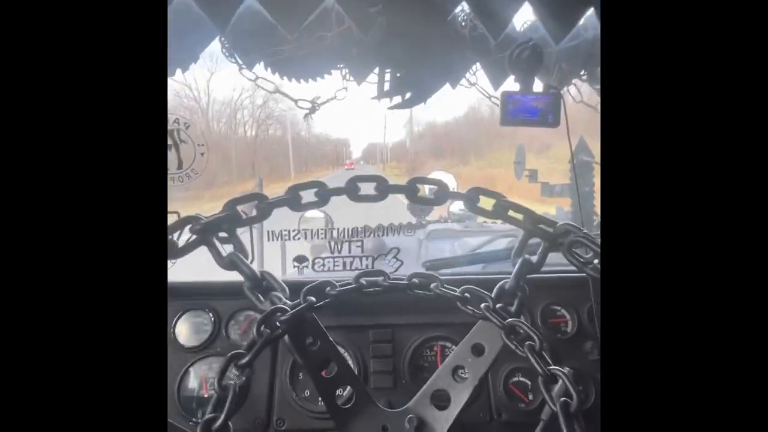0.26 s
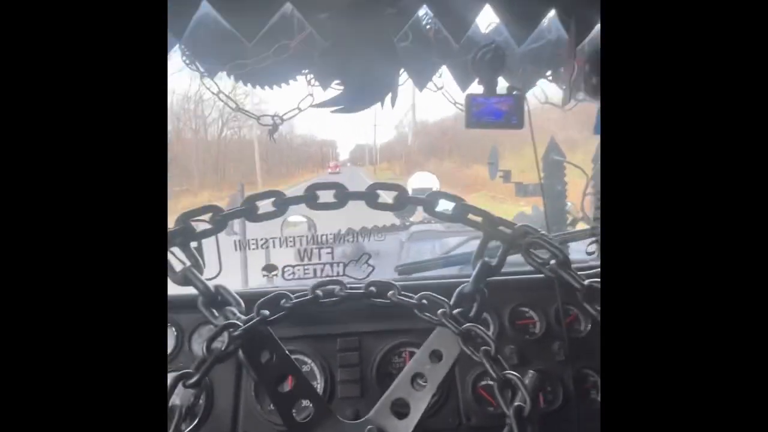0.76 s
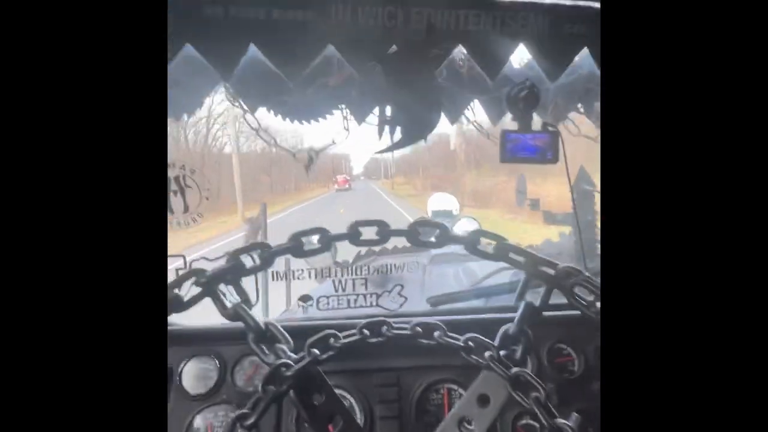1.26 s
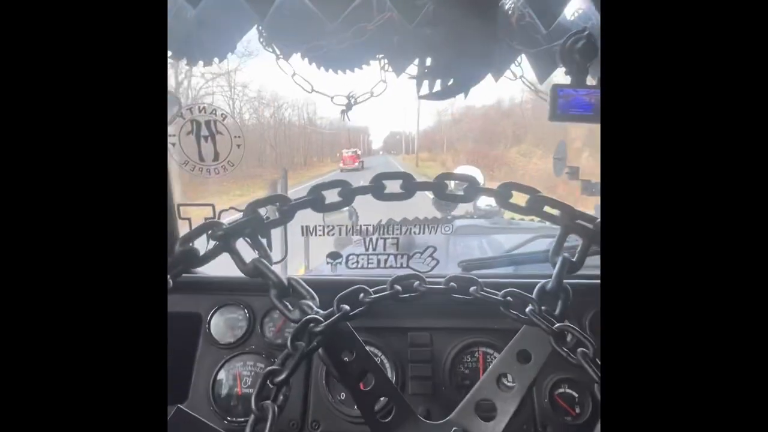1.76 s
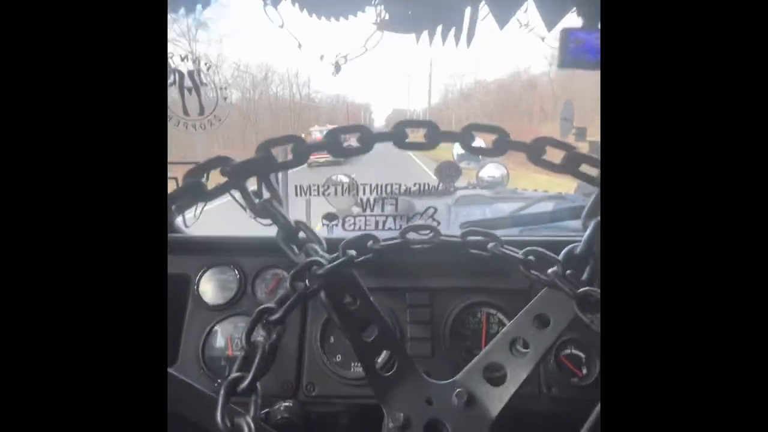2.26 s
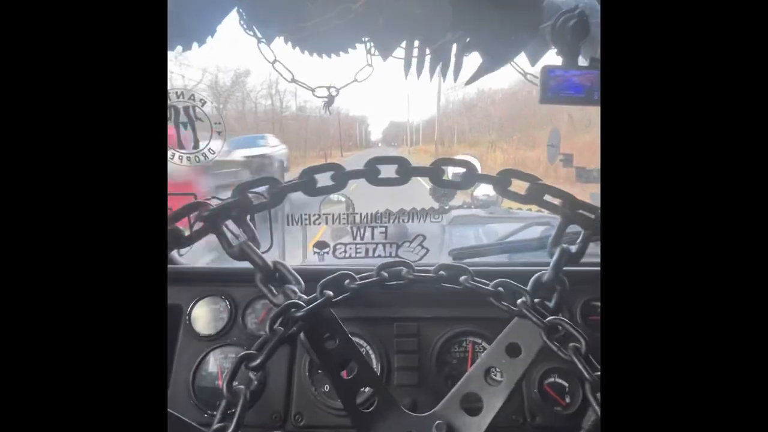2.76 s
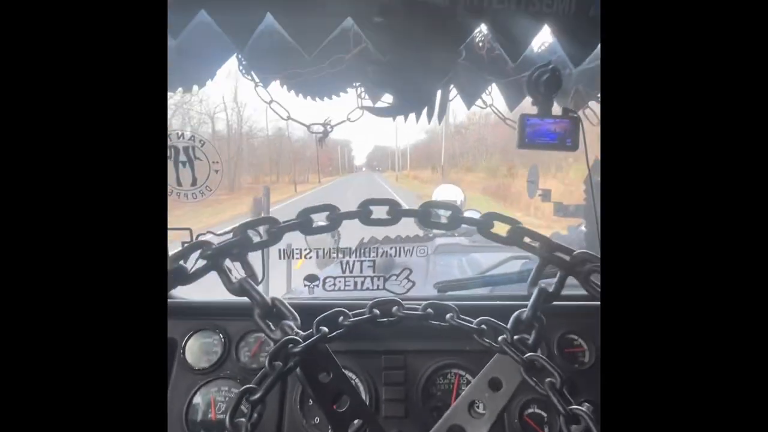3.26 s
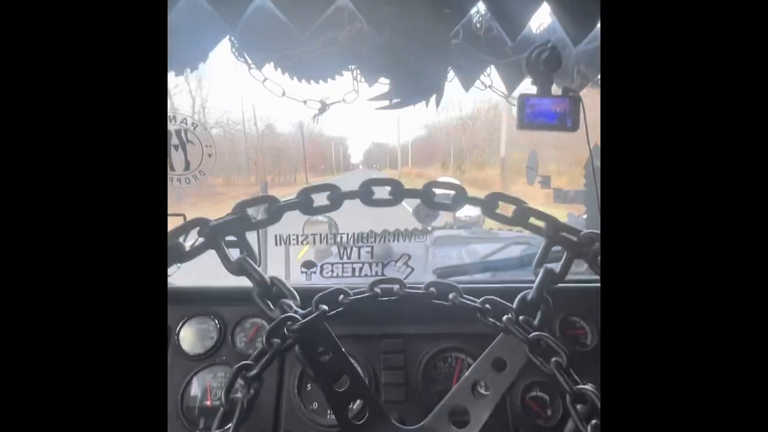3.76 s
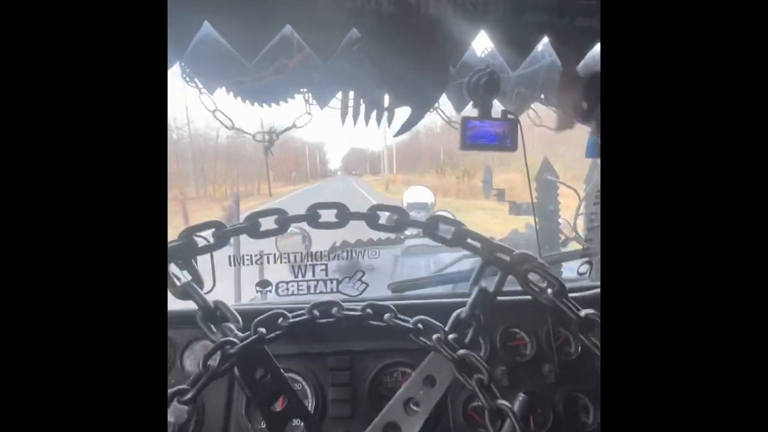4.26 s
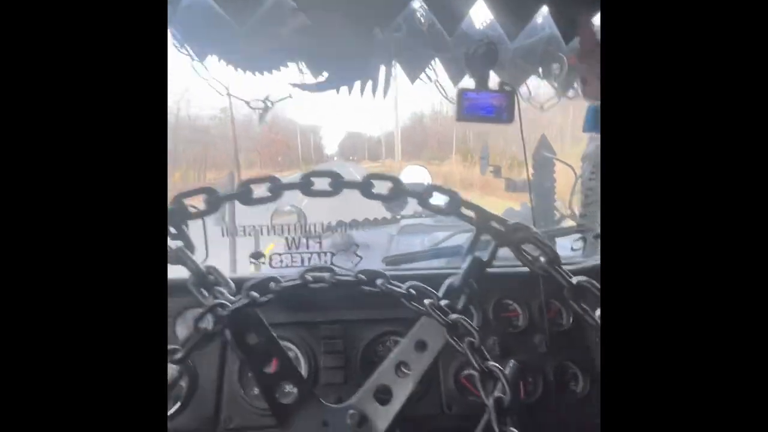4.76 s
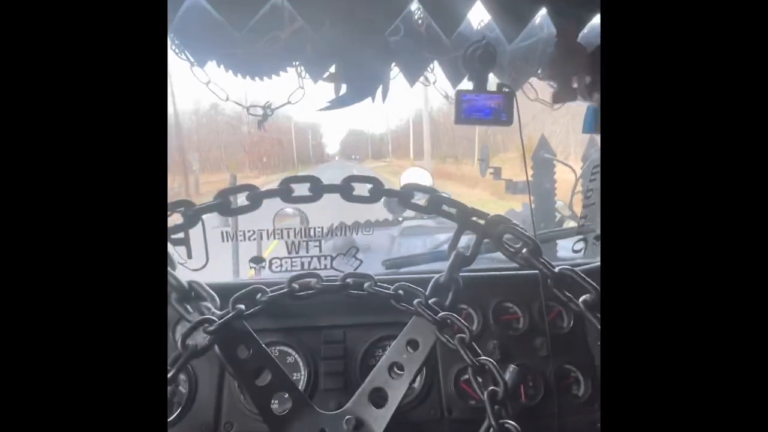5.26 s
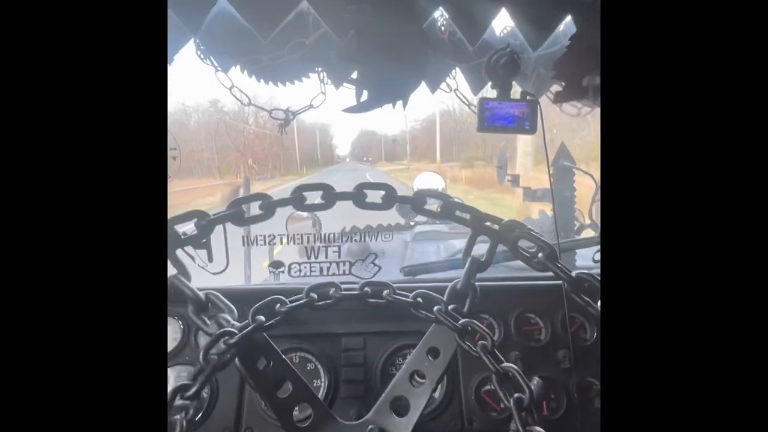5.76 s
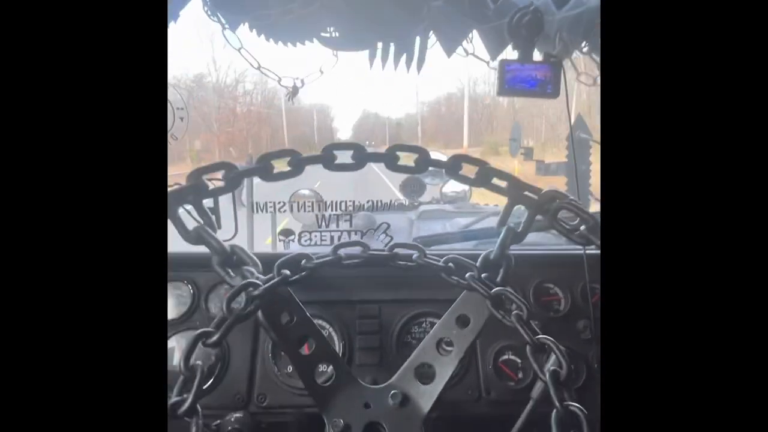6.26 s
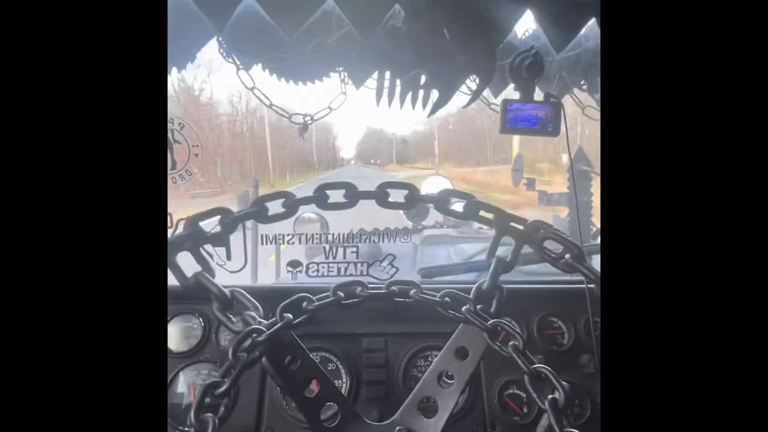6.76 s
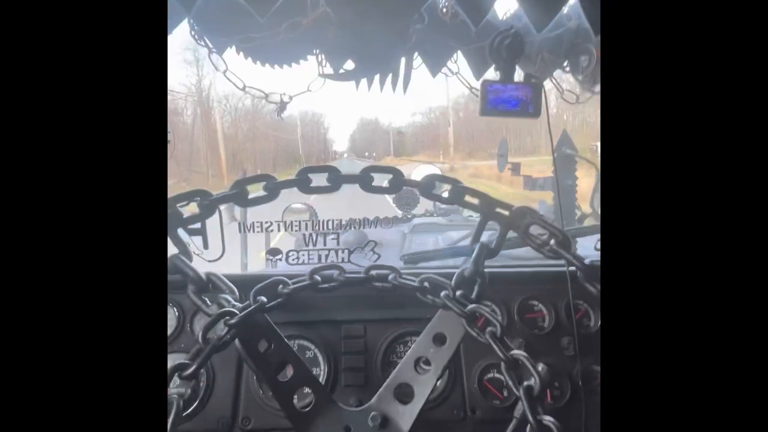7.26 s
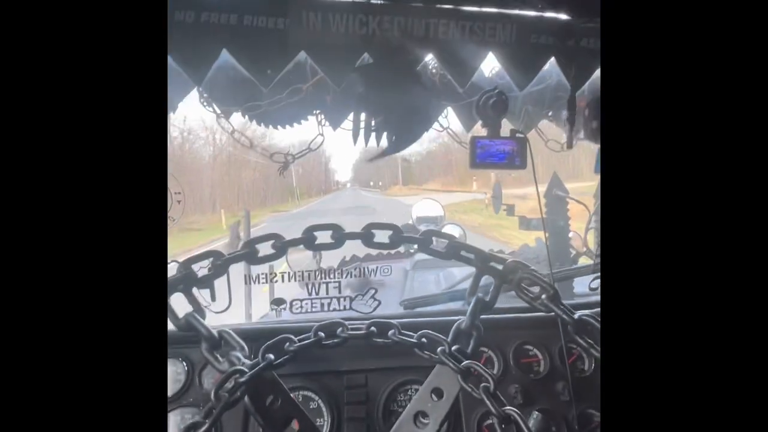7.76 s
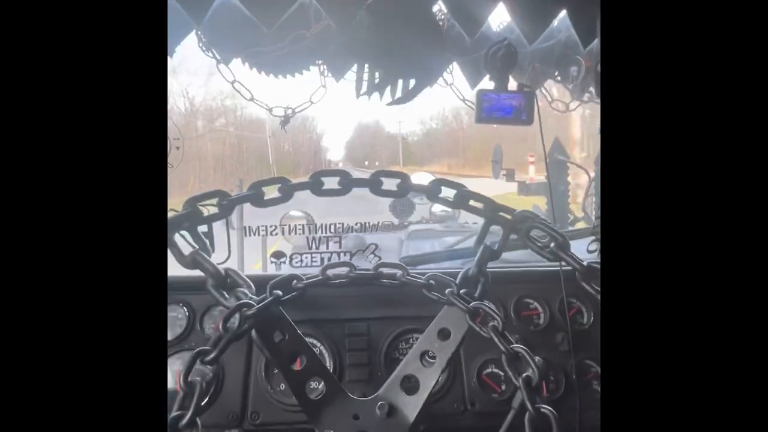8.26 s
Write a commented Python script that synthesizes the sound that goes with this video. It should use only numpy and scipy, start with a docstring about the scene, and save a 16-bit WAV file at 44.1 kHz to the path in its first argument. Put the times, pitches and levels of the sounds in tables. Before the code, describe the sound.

Close in-cab sound of a hard-pulling diesel on a road. Its throbbing drone and growl sag at two gear changes, and a blurred high whistle sinks and spools up after each. The first change brings a sharp air spit. Hollow intake hoots swell softly, while the dashboard buzzes, loose parts rattle, a small link squeaks and hanging chains jingle now and then.

```python
"""An exhaust drone fills the cab of a six-cylinder diesel truck throughout; it pulls hard and shifts up twice.
Engine tones follow the firing rate, over coloured noise for road and air. The intake hoots as a bending
tone, and the turbo whistle, a blurred tone, sinks at each shift and spools up again.
Small parts buzz, squeak and rattle as short rings and noise bursts. An air valve spits at the first
shift in shaped noise, and chains on the steering wheel clink as many fading tones."""
import sys
import numpy as np
from scipy import signal
from scipy.fft import rfft, irfft, next_fast_len
from scipy.io import wavfile
from scipy.ndimage import uniform_filter1d, minimum_filter1d

SR = 44100
rng = np.random.default_rng(int(sys.argv[2]) if len(sys.argv) > 2 else 0)


def waveform_to_disk(signal):
    """Save audio, clipped to [-1, 1], as 16-bit WAV at the path in sys.argv[1]."""
    frames = np.transpose(np.atleast_2d(signal))
    scaled = np.clip(frames, -1, 1) * 32767
    samples = np.round(scaled).astype(np.int16)
    wavfile.write(sys.argv[1], SR, samples)


N = 375732
TIME = np.arange(N) / SR


def gain_of(db):
    """Turns decibels into amplitude."""
    return 10 ** (np.asarray(db) / 20)


def evened(x):
    """Scales a sound to an average (rms) strength of 1."""
    return x / np.sqrt(np.mean(x ** 2) + 1e-20)


def read(points, hz):
    """Reads a table of frequencies at any frequency, on a logarithmic scale."""
    f, value = np.transpose(points)
    return np.interp(np.log(hz + 1), np.log(f + 1), value)


def curve(points):
    """Draws a (time, value) table as one value per sample."""
    s, value = np.transpose(points)
    return np.interp(TIME, s, value)


def add(mix, s, sound):
    """Mixes a stereo sound in at time s, in seconds."""
    part = mix[:, max(round(s * SR), 0):][:, :sound.shape[1]]
    part += sound[:, :part.shape[1]]


def drift(per_s, times=TIME):
    """Smooth random wandering of rms 1 that changes about per_s times a second."""
    knots = np.linspace(0, TIME[-1], N // 64)
    f = np.fft.rfftfreq(len(knots), knots[1])
    spectrum = rfft(rng.standard_normal(len(knots))) / (1 + (f / per_s) ** 4)
    return np.interp(times, knots, evened(irfft(spectrum, len(knots))))


# How alike noise is in the left and right channels: (frequency [Hz], likeness [-1 to 1])
LEFT_RIGHT_LIKENESS = [(140, 1), (300, .96), (500, .73), (900, .47), (1600, .52), (2500, .3), (3400, .22),
                       (4200, .4), (5000, -.1), (6200, 0), (7200, -.35), (8200, -.7), (9800, -.96),
                       (11000, -.998)]


def noise(spectrum, size=N, treble_db=0):
    """Coloured stereo noise: bass is alike in both channels, the highest treble is opposed."""
    full = next_fast_len(size)
    hz = np.fft.rfftfreq(full, 1 / SR)
    same = np.clip(read(LEFT_RIGHT_LIKENESS, hz), -1, 1)
    mid, side = rfft(rng.standard_normal((2, full))) * np.sqrt([1 + same, 1 - same])
    treble_tilt = treble_db * np.clip((hz - 4000) / 6000, 0, 1)
    colour = gain_of(read(spectrum, hz) + treble_tilt)
    return evened(irfft(np.array([mid + side, mid - side]) * colour, full)[:, :size])


def panned(x, right_db):
    """Leans a sound right by this many dB between the channels; below zero leans left."""
    return x * gain_of(np.array([[-.5], [.5]]) * right_db)


def cab_echo(x, count=14, spread=0.01, strength=.17):
    """Early reflections from glass and dashboard, up to spread seconds late, comb the sound finely."""
    taps = np.zeros((2, SR // 20))
    taps[:, 0] = 1
    for side in taps:
        delays = (rng.uniform(.1, 1, count) * spread * SR).astype(int)
        side[delays] += strength * rng.choice([-1, 1], count)
    return evened(signal.oaconvolve(x, taps, axes=1)[:, :N])


BOOM_COAST_DB = -22  # boom of the uneven cylinders without boost
# One pull in each gear: (pedal down [s], time to press [s], pedal lifted [s], time to lift [s],
# change of the drone's overtones [dB], boom of the uneven cylinders at full boost [dB])
PULLS = [(-0.5, .1, 0.5, .14, -2.5, -10.5), (1.268, 0.17, 4.66, .35, 2, -17),
         (5.58, 0.069, 9, .3, -2.5, -17)]


def pedal(bite_db=11, bite_s=0.16):
    """Throttle 0-1, and the dB each pull adds to overtones and boom; overtones bark as the gear loads."""
    throttle, bark_db, boom_db = np.zeros((3, N))
    for down, press, up, lift, overtones_db, pull_boom_db in PULLS:
        pressing = np.clip((TIME - down) / press, 0, 1)
        held = pressing * np.clip(1 - (TIME - up) / lift, 0, 1)
        bite = bite_db * np.exp(-np.maximum(TIME - down, 0) / bite_s)
        throttle += held
        bark_db += held * (overtones_db + bite)
        boom_db += held * (pull_boom_db - BOOM_COAST_DB)
    return throttle, bark_db, boom_db


# The drone under throttle, sweeping through the cab's resonances: (frequency [Hz], level [dB])
DRONE = [(64, -12.7), (66.3, -11.5), (69, -13), (71.5, -10.8), (74.5, -14), (77, -14), (128, -19.5),
         (130, -18.5), (132.4, -25), (135, -13.5), (138, -10), (142, -14), (147, -8), (151, -10.5),
         (155, -17), (195, -42), (212, -38), (222, -21), (227, -26), (233, -39)]
# The drone with the pedal up, one entry for each of three firing harmonics: level [dB]
COAST_LEVELS = [-18, -21.5, -42]


def drone_levels(firing_hz, throttle, bark_db):
    """Under throttle each firing harmonic swells to the cab's response at its pitch."""
    levels = []
    for k, coast in enumerate(COAST_LEVELS):
        pulling = read(DRONE, (k + 1) * firing_hz)
        bark = bark_db * (k > 0)  # only the overtones bark
        levels.append(coast + throttle * (pulling - coast) + bark)
    return levels


def exhaust(cycle, harmonics_db, throttle, flutter=0.089, falter=.4):
    """Six even firings a cycle give the drone and its overtones; with the pedal up they falter."""
    unsteady = flutter + falter * (1 - throttle)
    drone = 0
    for k, db in zip((6, 12, 18), harmonics_db):
        level = gain_of(db) * (1 + unsteady * drift(20))
        drone = drone + level * np.cos(2 * np.pi * k * cycle + unsteady * drift(21))
    return panned(np.sqrt(2) * drone, right_db=-.45)


# Cylinder imbalance: (multiple of the two-turn engine cycle, relative level [dB])
UNEVEN = [(2, 3), (3, -5), (4, 2.5), (5, -5.5), (7, -6), (8, -1), (9, 1.5), (10, -1.5), (11, 1), (13, -3),
          (14, 3), (15, 5.5), (16, -4.5), (17, 0)]
# How the cab answers low tones: (frequency [Hz], relative level [dB])
CAB = [(20, -27.5), (35, -10.5), (50, -8.5), (85, 0), (103, -4), (118, -1.5), (135, -2), (150, -3),
       (160, 0), (165, 3), (171, 0.5), (178, -11.5), (195, -14), (225, -11.5), (300, -26)]


def lope(cycle, cycle_hz, boom_db, waver=0.22):
    """Unequal cylinders add tones between the firing harmonics, which swell at the cab's resonances."""
    lines = 0
    for k, db in UNEVEN:
        level = gain_of(db + read(CAB, round(k) * cycle_hz)) * (1 + waver * drift(2.4))
        lines = lines + level * np.cos(2 * np.pi * (round(k) * cycle + rng.random()))
    return panned(evened(lines) * gain_of(boom_db), right_db=-.5)


# Panel resonances: (frequency [Hz], relative level [dB])
PANELS = [(190, -10), (225, 5), (258, 6), (292, -3), (302, 0), (312, 9), (324, 9.5), (345, 6), (372, 4),
          (400, 4), (425, -4), (460, 2), (490, 4), (525, -3), (570, 1), (615, -4), (655, -3), (690, -9),
          (745, -8), (800, -14), (1000, -21)]
# Engine orders that shake the cab differently: (multiple of the cycle, extra level [dB])
STRONG_ORDERS = [(20, 8), (21, 3), (23, 5), (24, 6), (25, -1), (26, 10), (27, 2), (28, 3), (29, 6), (30, 6),
                 (32, 4), (33, 3), (35, 6), (36, 4), (42, 6), (47, 4), (48, 3), (51, 4), (53, 4), (57, -2)]


def growl(cycle, cycle_hz, roar_db, throttle, tilt_db=0.3561, width=0.46, coast_db=-5):
    """The higher engine orders shake the panels; each swells as it crosses a resonance."""
    out, hop = np.zeros((2, N)), 256  # levels are worked out every hop samples
    # uneven firing times roughen the high orders
    turn = np.exp(2j * np.pi * (cycle + .0008 * drift(22)))
    line = turn ** 18
    extra_db = {round(k): db for k, db in STRONG_ORDERS}
    for k in range(19, 80):
        line = line * turn
        hz = k * cycle_hz[::hop]
        swell_db = 3 * np.minimum(drift(1.8, TIME[::hop]), 1.5)
        level_db = read(PANELS, hz) + tilt_db * k + extra_db.get(k, 0) + swell_db
        level = np.interp(TIME, TIME[::hop], gain_of(level_db))
        # left and right phases differ more at higher pitch
        stereo_phase = width * hz[0] / 400 * rng.standard_normal((2, 1))
        phase = 2 * np.pi * rng.random() + stereo_phase
        out += level * (line * np.exp(1j * phase)).real
    return panned(evened(out) * gain_of(roar_db + 1 + coast_db * (1 - throttle)), right_db=-2.0)


# Colours of the low rumble, the roar and the hiss: (frequency [Hz], relative level [dB per Hz])
RUMBLE = [(8, -23.5), (20, -9.5), (32, -6.5), (50, 0.5), (85, -2.5), (120, 4.5), (165, -6), (200, -11),
          (300, -13.5), (600, -51.5)]
ROAR = [(120, -26.5), (200, 4.5), (250, 3), (290, -3.5), (325, -14), (380, 3), (425, -4), (485, -2.5),
        (700, -7.5), (1000, -15.5), (1400, -19), (2200, -28.5), (5000, -56)]
HISS = [(600, -11), (1250, 3.5), (1470, 4.5), (1560, 5), (1650, 2), (2300, 0), (3200, 1.3), (4200, -2.5),
        (4900, -5.5), (5700, -5.5), (6500, -5), (7500, -11), (8500, -10.5), (9500, -23), (12000, -54.5),
        (14500, -35.5), (15700, -31.5)]
# Tread of the tyres on the asphalt: (frequency [Hz], relative level [dB per Hz])
TYRES = [(500, -26), (780, -3), (910, 1), (1100, -1.5), (1300, -12), (1900, -46.5)]


def road_and_air(cycle, boom_db, roar_db, hiss_db, rumble_db=-25, tyres_db=-35.5):
    """Rumble and tyre noise under a roar and hiss that pulse one, three and six times an engine cycle."""
    beat = np.cos(6 * np.pi * cycle) + 0.93 * np.cos(12 * np.pi * cycle) + 0.55 * np.cos(2 * np.pi * cycle)
    # the rumble rises a little with the boom
    rumble = noise(RUMBLE) * gain_of(rumble_db + 0.077 * (boom_db - boom_db.mean()))
    roar = noise(ROAR) * gain_of(roar_db) * (1 + 0.2 * beat + 0.098 * drift(48))
    hiss = noise(HISS) * gain_of(hiss_db) * (1 + 0.017 * beat + 0.14 * drift(16))
    tyres = noise(TYRES) * gain_of(tyres_db)
    return rumble + panned(roar + tyres, right_db=-2.0) + panned(hiss, right_db=-1.0)


# Swells of the intake hoot: (peak time [s], length [s], level [dB])
HOOTS = [(0.727, 0.27, -24.5), (1.091, 0.15, -20.5), (2.17, 0.56, -26), (2.897, 0.37, -27),
         (4.88, 0.24, -22.5), (6.23, 0.17, -25.5), (6.69, 0.66, -23), (7.4, 0.74, -31.5),
         (8.48, 0.4, -22.5)]
# How the hoot bends, pedal up: (turbo blade tone [Hz], hoot pitch [Hz])
HOOT_PITCH = [(5000, 346), (5900, 355), (6500, 366), (7400, 377), (7950, 380), (8130, 373)]


def intake(blade_hz, throttle, rest_db=-42.5, load_hz=5, waver_hz=2, flutter=0.24):
    """A hollow hoot that bends with the turbo's airflow and comes in swells."""
    level = gain_of(rest_db)
    for s, length, db in HOOTS:
        level = level + gain_of(db) * np.exp(-(2 * (TIME - s) / length) ** 2)
    hz = read(HOOT_PITCH, blade_hz) + load_hz * throttle + waver_hz * drift(20.1)
    hoot = np.cos(2 * np.pi * np.cumsum(hz) / SR)
    return panned(np.sqrt(2) * level * (1 + flutter * drift(8.9)) * hoot, right_db=-1.5)


# The whistle under throttle, sweeping through the intake duct's resonances:
# (frequency [Hz], level before its patchy changes [dB])
WHISTLE = [(4750, -54), (5060, -40), (5450, -42), (5900, -42), (6500, -37.5), (6950, -40.5), (7650, -42),
           (8000, -41), (8130, -42)]


def turbo(blade_hz, throttle, coast_db=-5, flutter=0.51, port_phase=2.65):
    """The compressor's blade tone, blurred by turbulent air; off boost it turns weak and patchy."""
    slack = np.clip(3 * (1 - blade_hz / blade_hz.max()), 0, 1)
    blur_hz = (30 + 30 * slack) * drift(130)
    phase = 2 * np.pi * np.cumsum(blade_hz + blur_hz) / SR
    channels = []
    for p in (phase, phase + port_phase):
        channels.append((1 + flutter * drift(100)) * np.cos(p) + flutter * drift(80) * np.sin(p))
    patches_db = (1.2 + .6 * slack) * drift(16) - 2 * slack
    level_db = read(WHISTLE, blade_hz) + coast_db * (1 - throttle) + patches_db
    return evened(np.array(channels)) * gain_of(level_db)


def buzz(hiss_db, below_hiss_db=-10, per_s=3.5, t60=0.08, count=56):
    """Many small fittings in the dashboard tick faintly, each at its own pitch."""
    t, out = np.arange(SR // 10) / SR, np.zeros((2, N))
    fade = gain_of(-60 * t / t60) * (1 - np.exp(-t / 0.003))
    for hz in np.linspace(1400, 3800, count) + rng.uniform(-15, 15, count):
        taps = (rng.random(N) < per_s / SR) * rng.uniform(0.25, 1, N)
        ring = np.sin(2 * np.pi * (hz * t + 0.43 * rng.random((2, 1)))) * fade
        out += signal.oaconvolve(taps[None], ring, axes=1)[:, :N]
    return evened(out) * gain_of(hiss_db + below_hiss_db)


def faint_squeaks(count=30, level_db=-48, pitch_hz=5790, length=0.029):
    """The link's slighter rubs at random times, as rows like those of SQUEAKS."""
    return [(at * TIME[-1], length, pitch_hz + 120 * (bend - .5), level_db)
            for at, bend in rng.random((count, 2))]


# A small link squeaks as it rubs: (time [s], length [s], middle pitch [Hz], level [dB])
SQUEAKS = [(.03, .04, 5700, -42), (.1, .04, 5650, -43), (.92, .05, 5950, -44), (1.0, .06, 5900, -44),
           (1.12, .06, 5520, -43), (1.172, .055, 5800, -37), (1.23, .05, 5680, -39),
           (1.292, .05, 5800, -37.5), (1.345, .06, 5800, -42), (1.865, .06, 5820, -41),
           (1.93, .05, 5830, -41), (2.695, .03, 5750, -41), (2.968, .02, 6050, -39), (4.15, .06, 5820, -44),
           (4.36, .06, 5760, -44), (5.63, .05, 5850, -45), (5.72, .04, 5800, -44), (5.8, .04, 5900, -44),
           (5.89, .035, 5880, -43), (6.235, .03, 5550, -42), (6.29, .04, 5720, -42), (6.82, .05, 5820, -42),
           (6.88, .045, 5760, -41), (6.94, .05, 5850, -43), (7.218, .03, 5600, -41),
           (7.705, .05, 5800, -41), (7.757, .05, 5800, -41), (7.872, .03, 5740, -39),
           (7.94, .04, 5810, -40), (7.99, .035, 5740, -41), (8.145, .04, 5790, -36),
           (8.18, .035, 5780, -39), (8.315, .045, 5770, -37), (8.425, .055, 5740, -40),
           (8.455, .045, 2680, -36), (8.485, .04, 5870, -38)]


def squeaks(sag=0.02, waver=.005, flutter=0.38):
    """Each rub is a short swelling tone that sags a little in pitch."""
    out = np.zeros((2, N))
    for s, length, hz, db in SQUEAKS + faint_squeaks():
        u = np.arange(0, 1, 1 / (length * SR))  # progress through the squeak
        bend, grip = evened(uniform_filter1d(rng.standard_normal((2, len(u))), size=150))
        phase = 2 * np.pi * np.cumsum(hz * (1 + sag * (.5 - u) + waver * bend)) / SR
        swell = np.sqrt(2) * np.sin(np.pi * u ** 1.3) * (1 + flutter * grip)
        add(out, s, gain_of(db) * swell * np.cos(phase + np.array([[0], [1.1]])))
    return out


def faint_rattles(count=14, level_db=-45.5, spread_db=8.5, rise=0.0091, t60=0.15, treble_db=-1.5):
    """Small bumps of the road at random times, as rows like those of RATTLES."""
    return [(at * TIME[-1], level_db + spread_db * (2 * size - 1), rise, t60, treble_db, 2500 + 1700 * part, -3)
            for at, size, part in rng.random((count, 3))]


# Loose trim on the bigger bumps: (time [s], level [dB], rise [s], time to fade by 60 dB [s],
# extra treble [dB], ring of the part [Hz], ring against the clack [dB])
RATTLES = [(0.126, -29.5, .012, 0.11, 1, 2900, -7), (0.483, -26, .001, 0.086, 8, 3400, -8),
           (0.954, -29, 0.0022, .06, 12, 3000, -14), (0.968, -32, .003, 0.31, 3, 3550, -12),
           (1.295, -35.5, .002, 0.068, -10, 4600, -2), (1.641, -28, .001, .05, 4, 3000, -5),
           (1.781, -34, .002, 0.054, 12, 3000, -8), (1.881, -26, .002, 0.054, 6, 4600, -14),
           (2.613, -23, .001, 0.055, 7, 2440, 0), (2.64, -34, .002, 0.06, 12, 3530, -2),
           (2.85, -29, 0.015, .15, -3, 3180, -8), (3.096, -28.5, .002, 0.074, 10, 2900, -2),
           (3.111, -27, 0.0063, 0.14, 6, 3050, -1), (3.508, -27, 0.00092, 0.07, 12, 3200, -8),
           (3.95, -33, .025, 0.26, 2, 2680, -5), (4.051, -28.5, .003, 0.065, -2, 4020, -0.5),
           (4.113, -31, .004, 0.16, 11, 2850, 1), (4.13, -31, 0.0036, 0.1, -9, 2900, 1),
           (4.5, -24, .001, .05, 16, 3470, -3), (4.504, -31, .001, 0.083, -5, 4460, 4.5),
           (4.594, -32.5, .003, .06, -13, 3100, 2), (4.697, -34, .002, .06, 14, 2980, -5),
           (4.729, -25, .001, 0.072, 0, 3750, 3.5), (4.736, -24.5, .001, 0.073, -4, 2660, -6),
           (4.979, -29, .003, 0.071, 2, 3320, -12), (5.222, -31, .001, .03, 14, 3900, -5),
           (5.225, -27, .001, 0.1, -10, 3000, 2.5), (5.244, -27, .001, 0.049, 10, 3930, -2),
           (5.255, -30, .001, 0.12, 6, 2920, -3), (5.752, -28, 0.015, 0.12, -10, 3000, -7),
           (6.381, -30, 0.0027, 0.078, -3, 3950, -7), (6.919, -32.5, .006, .08, 1, 2800, -2),
           (7.068, -27, 0.0086, 0.092, 0, 2740, -5), (7.091, -29.5, .004, .12, -8, 2400, -7),
           (7.256, -32, .001, .04, 16, 3300, -6), (8.476, -35, .002, .07, 3, 2840, 0)]
# Colour of the clack: (frequency [Hz], relative level [dB per Hz])
TRIM = [(400, -13.5), (1000, 0.5), (2000, -2.5), (3000, 0.5), (4000, 0), (5000, -4), (6500, -9.5),
        (8500, -4), (9800, -6.5), (11000, -17), (15500, -21.5)]


def trim(grit_db=0.5, ring_t60=0.013):
    """Short gritty rattles of loose parts, each with its own ring and its own reflections in the cab."""
    out, t = np.zeros((2, N)), np.arange(SR // 5) / SR
    for s, db, rise, t60, treble_db, ring_hz, ring_db in RATTLES + faint_rattles():
        bumps = evened(uniform_filter1d(rng.standard_normal(len(t)), size=90))
        grit = evened(gain_of(grit_db * bumps))
        burst = noise(TRIM, size=len(t), treble_db=treble_db)
        clack = cab_echo(burst, spread=0.0044, strength=0.033)[:, :len(t)]
        # the clack sets the part ringing
        mode = np.sin(2 * np.pi * ring_hz * t) * gain_of(-60 * t / ring_t60)
        ring = gain_of(ring_db) * evened(signal.fftconvolve(clack, mode[None], axes=1)[:, :len(t)])
        level = np.minimum(t / rise, 1) * gain_of(db - 60 * np.maximum(t - rise, 0) / t60)
        add(out, s, (clack * grit + ring) * level)
    return out


# Colours of the valve's clack and of its hiss: (frequency [Hz], relative level [dB per Hz])
VALVE_CLACK = [(600, -14), (1050, 5), (1300, 3), (1700, -4), (2200, -3), (2480, 3), (2750, -3), (3200, -7),
               (3700, -10), (4400, -8), (4700, -3), (5000, -6), (7500, -27), (8700, 0), (9400, -16),
               (11000, -14), (15500, -20)]
VALVE_HISS = [(4000, -25), (5100, -7), (5400, -5), (5750, 4), (6300, -4), (6600, -2), (7150, -7),
              (7500, -15), (8500, -11), (9500, -39), (14000, -34), (15500, -20)]


def air_valve(at_s=.497, clack_db=-16.5, clack_t60=.2, puff_db=-14.5, puff_t60=.12,
              tail_db=-23, tail_t60=.48, open_s=.004):
    """The gearshift's air valve clacks open, spits, and hisses on as its line empties."""
    out, t = np.zeros((2, N)), np.arange(SR // 3) / SR
    clack_level = gain_of(clack_db - 60 * t / clack_t60) * (1 - np.exp(-t / 0.00072))
    clack = noise(VALVE_CLACK, size=len(t)) * clack_level
    flow = gain_of(puff_db - 60 * t / puff_t60) + gain_of(tail_db - 60 * t / tail_t60)
    opening = 1 - np.exp(-(t / open_s) ** 2)
    hiss = cab_echo(noise(VALVE_HISS, size=len(t)))[:, :len(t)] * flow * opening
    add(out, at_s, clack + hiss)
    return out


# Ring of free chain links: (frequency [Hz], relative level [dB], time to fade by 60 dB [s])
LINKS = [(1782, -11, .25), (2600, -12, .12), (3300, -5, .24), (3472, -3, .2), (4050, -12, .12),
         (4560, -10, .15), (5020, -4, .14), (5372, -6, .14), (5435, -3, .2), (5729, -4, .14),
         (5830, -1.5, .14), (6022, 0, .18), (6143, -1, .15), (6404, 0, .14), (6778, 0, .16), (6874, -2, .1),
         (7160, -4, .08), (7246, -6, .15), (7603, -1, .14), (8104, -15, .1), (8400, -17, .08),
         (8680, -18, .1), (15400, -15, .1)]
# Blur of many links sliding at once: (frequency [Hz], relative level [dB per Hz])
SLIDE = [(1000, -9), (3000, -7), (4400, -15), (5300, -9), (5950, -6), (6600, -0.5), (7150, -15),
         (7600, -33), (8700, -2.5), (10000, -21), (14000, -20), (15400, -21.5)]
# Chain clinks: (time [s], level [dB], clatter length [s], extra level of low tones [dB],
# sliding links [dB], ring length relative to free links)
CLINKS = [(1.562, -21, .011, -13, -3, 1.2), (1.932, -37.5, 0.019, -15, -1, 1),
          (4.426, -36.5, 0.018, 9, 3, 0.87), (4.5, -31.5, .005, -6, 8, 0.6),
          (4.854, -15, 0.016, -0.5, -6.5, 0.92), (5.017, -36.5, .008, -8, 1, .8),
          (5.572, -34, 0.005, -6, 5.5, .4), (6.137, -30.5, 0.006, 6, 7, 0.35)]


def chain(scatter_db=4.0, rebound=0.81, slide_t60=0.16):
    """Each clink is a first blow and a few rebounds of links on one another; taut links only snap."""
    out, t = np.zeros((2, N)), np.arange(SR // 3) / SR
    hz, db, t60 = np.transpose(LINKS)[:, :, None]
    for s, clink_db, clatter, low_db, slide_db, ring in CLINKS:
        sound = np.zeros((2, len(t)))
        decay = gain_of(db + low_db * (hz < 4800) - 60 * t / (ring * t60))
        decay = decay * np.sqrt(2 / np.sum(gain_of(db) ** 2))
        for late in np.append(0, rng.random(4)):  # 0 is the first blow
            # no two links ring alike
            detune = 1 + 0.01 * late * rng.standard_normal(hz.shape)
            modes = decay * np.exp(2j * np.pi * hz * detune * t)
            strengths = gain_of(scatter_db * rng.standard_normal((2, len(hz))))
            weights = strengths * np.exp(2j * np.pi * rng.random((2, len(hz))))
            slide = gain_of(slide_db - 60 * t / (ring * slide_t60)) * noise(SLIDE, size=len(t))
            blow = rebound * np.exp(-late) if late else 1
            add(sound, late * clatter, ((weights @ modes).real + slide) * blow)
        add(out, s, gain_of(clink_db) * sound * (1 - np.exp(-t / 0.0013)))
    return out


# Engine speed: (time [s], firings per second [Hz])
SPEED = [(0, 77.3), (.58, 78.5), (.85, 70.8), (.99, 66), (1.25, 64), (1.45, 64.3), (1.63, 65), (1.8, 66.2),
         (2, 67.5), (2.3, 68.2), (2.8, 70.6), (3.5, 72.8), (4.65, 76.6), (4.9, 68.6), (5.25, 63.1),
         (5.52, 63.1), (5.66, 64.3), (6.4, 65.2), (7.15, 67.6), (8.52, 70.5)]
# Turbo speed: (time [s], blade tone [Hz])
SPOOL = [(0, 7990), (.6, 7938), (.8, 6900), (1.2, 5380), (1.52, 5000), (1.7, 5186), (2.05, 6030),
         (2.45, 7300), (2.75, 7880), (3.1, 8115), (4.72, 8120), (4.93, 6845), (5.25, 5560), (5.75, 4700),
         (6.08, 5275), (6.4, 6226), (6.8, 7123), (7.15, 7740), (7.5, 8020), (8.2, 8020), (8.52, 7760)]
# How hard the engine works; only the changes count: (time [s], level [dB])
EFFORT = [(0.0, -22.5), (0.5, -23), (0.7, -25.5), (1.15, -26.5), (1.6, -26), (2.5, -20.5), (3.1, -21.5),
          (3.9, -19.5), (4.3, -22.5), (4.65, -24), (5.0, -26.5), (5.4, -27.5), (6.0, -25), (6.7, -21.5),
          (7.2, -22.5), (7.8, -21.5), (8.52, -24)]


def scene():
    """All sources as heard from the driver's seat, led by engine speed, turbo speed, effort and pedal."""
    firing_hz, blade_hz, effort_db = curve(SPEED), curve(SPOOL), curve(EFFORT)
    throttle, bark_db, pull_boom_db = pedal()
    # boost sets in at a blade tone of 5000 Hz and is full 895 Hz higher
    boost = np.clip((blade_hz - 5000) / 895, 0, 1)
    boom_db = BOOM_COAST_DB + boost * pull_boom_db
    effort_db = effort_db - effort_db.mean()
    roar_db = -25.5 + 1.01 * effort_db
    hiss_db = -33.5 + 0.97 * effort_db
    cycle_hz = firing_hz / 6
    cycle = np.cumsum(cycle_hz) / SR  # engine cycles so far, two turns each
    engine = exhaust(cycle, drone_levels(firing_hz, throttle, bark_db), throttle)
    engine = engine + lope(cycle, cycle_hz, boom_db) + growl(cycle, cycle_hz, roar_db, throttle)
    air = road_and_air(cycle, boom_db, roar_db, hiss_db) + intake(blade_hz, throttle) + turbo(blade_hz, throttle)
    loose_parts = buzz(hiss_db) + squeaks() + trim() + chain()
    return engine + air + loose_parts + air_valve()


def record(dry, ceiling=.92, edge_hz=15900):
    """A fast limiter holds the peaks down; then a filter removes the treble above edge_hz."""
    room = np.minimum(1, ceiling / (abs(dry).max(0) + 1e-9))
    limited = dry * uniform_filter1d(minimum_filter1d(room, size=300), size=300)
    low_pass = signal.firwin(511, edge_hz, window=("kaiser", 9), fs=SR)
    return signal.oaconvolve(limited, low_pass[None], "same")


dry = scene()
out = record(dry)
waveform_to_disk(out)
```